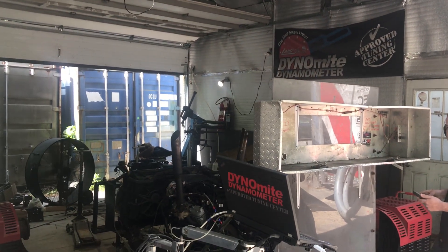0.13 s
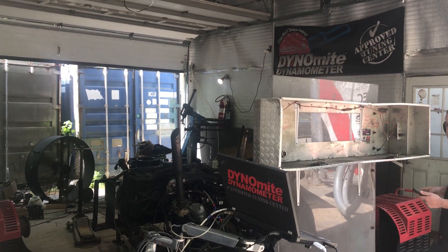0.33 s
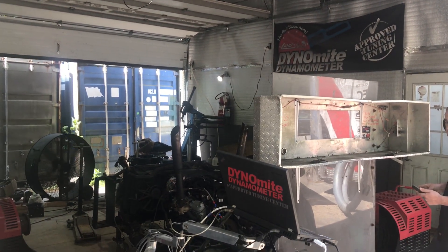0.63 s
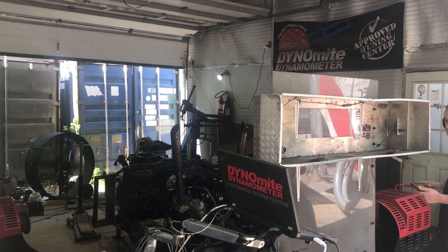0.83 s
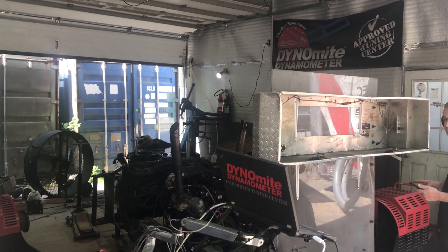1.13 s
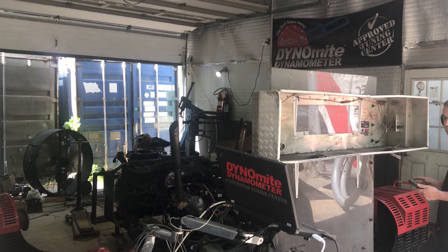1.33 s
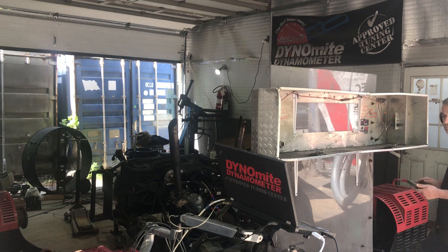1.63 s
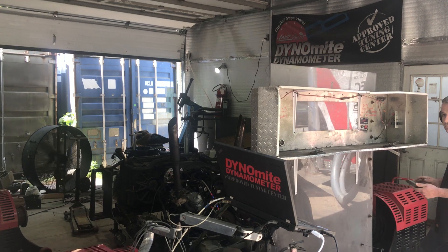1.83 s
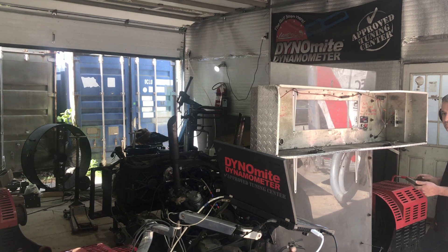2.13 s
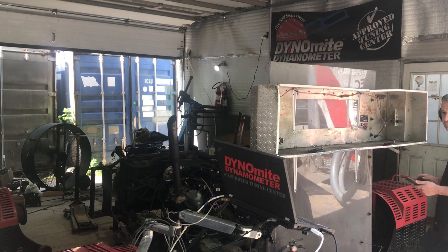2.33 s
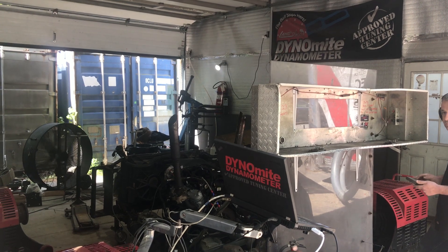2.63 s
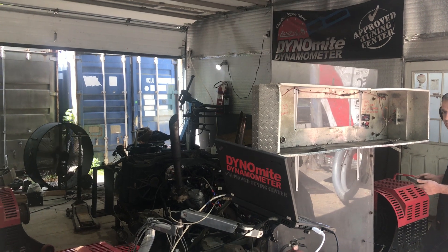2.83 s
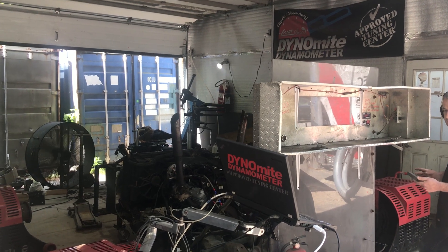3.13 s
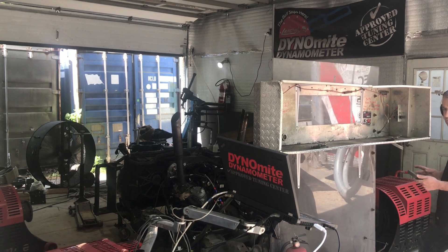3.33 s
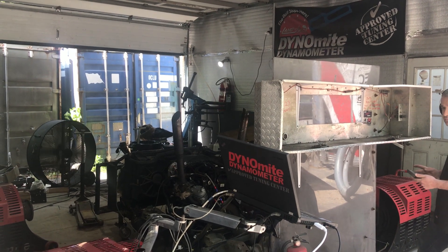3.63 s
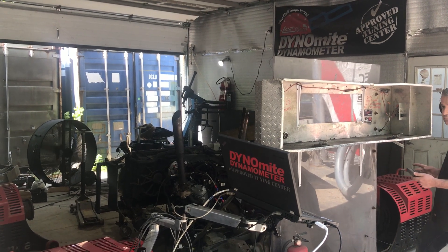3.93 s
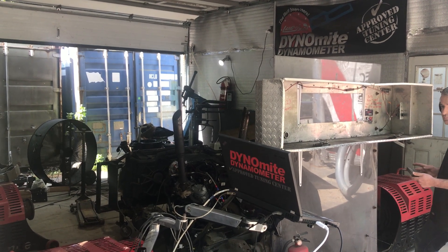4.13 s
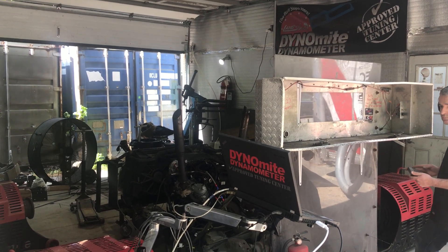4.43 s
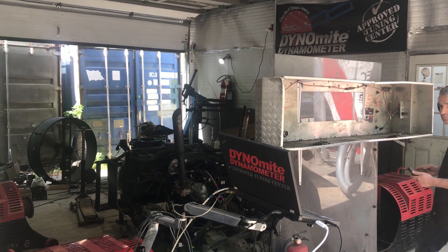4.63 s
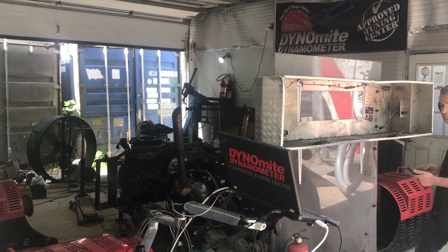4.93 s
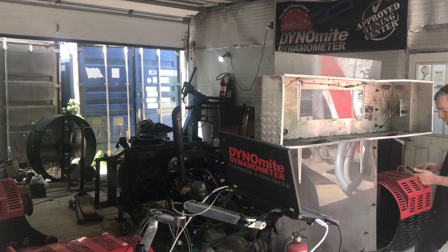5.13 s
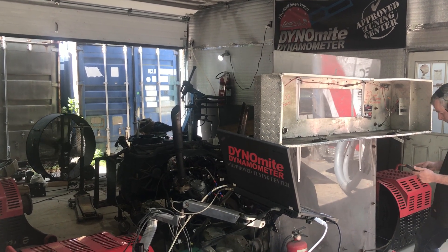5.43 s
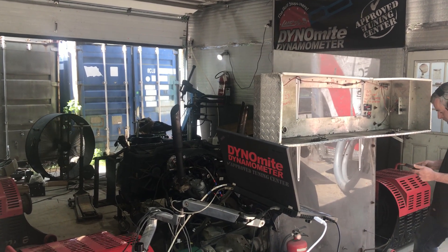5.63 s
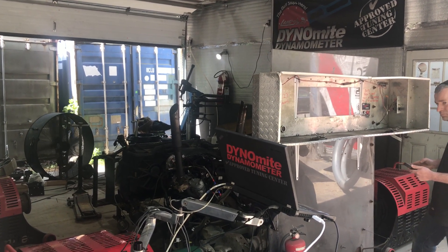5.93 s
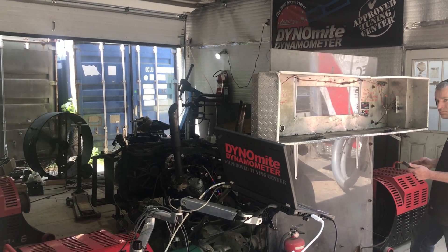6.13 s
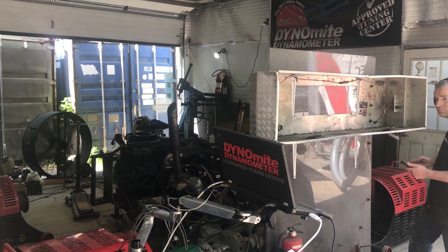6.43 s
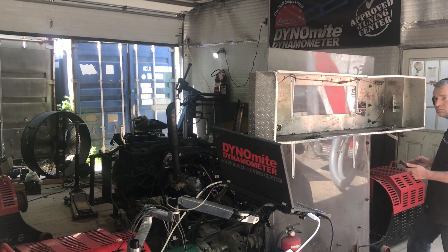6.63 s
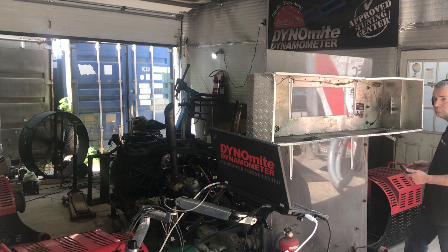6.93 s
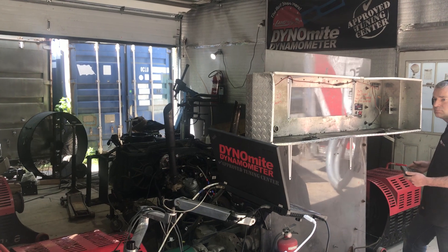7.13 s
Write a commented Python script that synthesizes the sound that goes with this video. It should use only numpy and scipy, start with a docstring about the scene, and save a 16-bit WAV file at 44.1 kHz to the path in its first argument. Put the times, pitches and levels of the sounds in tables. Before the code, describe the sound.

A V8 engine with open exhaust stacks runs close by in a workshop. It settles into a lumpy idle with a faint, thin whistle, is blipped once and falls back with a hollow bark. Then the throttle opens wide: the revs surge, are dragged down under load, hold in a deep rasping roar and finally climb again. The walls add boom and a short echo.

```python
"""Cross-plane V8 with open exhaust stacks on a workshop dynamometer: lumpy idle, a blip, then full
throttle against the brake. Each firing rings the stacks and the room and releases a burst of gas.
The near bank fires unevenly and is the louder one. Load drives bass and bark, throttle drives rasp.
The firing tone swells and fades as it glides through the room's standing waves.
At idle, air whistles faintly past the throttle."""
import sys
import numpy as np
from scipy import signal
from scipy.fft import rfft, irfft, next_fast_len
from scipy.io import wavfile
from scipy.ndimage import uniform_filter1d

SR = 44100
rng = np.random.default_rng(int(sys.argv[2]) if len(sys.argv) > 2 else 0)


def generate_wav(sig):
    """Save sig (samples, or channels by samples) to the path in sys.argv[1] as 16-bit PCM at SR."""
    pcm = np.round(np.clip(np.atleast_2d(sig).T, -1, 1) * 32767).astype(np.int16)
    wavfile.write(sys.argv[1], SR, pcm)


N = 321489
TIME_S = np.arange(N) / SR

# target speed: t/s, firing rate/Hz
SPEED = [(0.0, 57.76), (0.097, 66.8), (0.499, 83.67), (1.103, 91.76), (1.63, 130.32), (1.959, 146.45),
         (2.146, 142.82), (2.711, 97.48), (3.037, 99.53), (3.483, 145.56), (3.642, 151.21), (3.884, 137.71),
         (4.165, 113.11), (4.443, 106.57), (5.085, 116.62), (5.883, 109.35), (6.155, 115.85),
         (6.821, 152.81), (7.29, 170.6)]
# idle, blip, overrun, wide open: t/s, throttle/0-1, load/0-1, base crackle level/dB
DRIVE = [(0, 0.82, 1, -25.5), (.48, 0.51, 0.66, -30.5), (.78, 0.16, 0.43, -45.5), (.98, 0.19, 0.47, -42),
         (1.26, 0.51, 1, -28.5), (1.36, 0.4, 0.74, -31), (1.48, 0.15, 0.02, -37), (2.0, 0, 0.12, -41),
         (2.45, 0.02, 0, -39.5), (2.85, 0.31, 0.06, -36), (3.03, 0.67, .4, -30), (3.17, 0.79, 0.87, -26),
         (3.42, 1, 0.75, -24.5), (7.29, 0.98, 0.84, -25)]
# cylinders in firing order: bank (1 near, -1 far)
BANK = [1, -1, -1, 1, -1, 1, 1, -1]
# cylinders in firing order: relative gas burst level/dB
BURST_DB = [0, -49, -9, 3, -16, 0.5, 2, -27]
# unequal headers, orders 9-30 of the four-stroke cycle: relative level/dB
HEADER_ORDERS_DB = [1, -3, 7.5, -3, 10, 4, 3, 4, 7, -5, 3.5, 0.5, 12.5, -10.5, 8, 3.5, -5, 5, 2, -6, 6.5,
                    2.5]
# low response of the stacks: f/Hz, gain/dB
PIPE_RESPONSE = [(135, -9), (168, 4), (203, -13.5), (235, -6), (272, 3.5), (300, -1), (325, -11),
                 (356, -3.5), (380, -8.5), (404, -5), (455, -32.5), (600, -49)]
# upper stack resonances: f/Hz, width/Hz, gain/dB
STACK_MODES = [(556.6, 63, -6), (639.6, 64, 3), (715.6, 52, -2), (801, 40, -6), (870.5, 32, -1),
               (959.5, 52, -3.5), (1055, 68, -7.5), (1249, 164, -11.5), (1430, 410, -15.5)]
# stack mouth resonances under hard flow: f/Hz, width/Hz, gain/dB
MOUTH_MODES = [(418, 22, 9.5), (693, 79, -5), (964, 193, -2), (1040, 38, 0), (2890, 85, -10),
               (3530, 2100, -11)]
# broadband gas noise: f/Hz, gain/dB
RASP_SPECTRUM = [(35, -4.5), (400, -2), (700, -5), (1000, 1), (1500, -2.5), (2300, -2.5), (3200, -2),
                 (4100, -3.5), (5000, -6), (6500, -6.5), (10000, -21)]
# treble gas noise: f/Hz, gain/dB
CRACKLE_SPECTRUM = [(2500, -49), (5000, -8.5), (6000, -3), (7000, 4), (7700, 1), (8600, 3), (9800, -0.5),
                    (10400, -4), (11200, -1), (13000, -2.5), (15800, -11.5)]
# standing waves of the workshop: f/Hz, width/Hz, gain/dB
ROOM_MODES = [(75.4, 14, -6), (113.7, 28.3, 1), (129.9, 15, -4)]
# bass in the room at full load: firing rate/Hz, tone level/dB, boom level/dB, pipe level/dB
BASS_LEVELS = [(60, -16, -20, -20), (70, -16, -13.5, -26), (75.5, -11.5, -15.3, -23),
               (89.5, -15.5, -15, -22), (100, -18.3, -23, -24.5), (106.6, -15, -22.5, -18),
               (111, -10, -31, -23), (120, -11, -22.5, -22.5), (136.5, -10.5, -23.5, -23),
               (148, -24.5, -20, -21), (159, -34, -15.5, -18.5), (167, -23.3, -15.5, -20)]
# intake whistle: t/s, f/Hz, level/dB
WHISTLE = [(.42, 2070, -75), (.5, 2060, -51), (.55, 2050, -46), (.61, 2070, -47), (.68, 2140, -51),
           (.78, 2020, -56), (.9, 2140, -82)]


def engine():
    """Eight cylinders fire in turn into two stacks; flywheel inertia smooths the speed."""
    firing_hz = smooth(curves(SPEED)[0], 5733, mode="nearest")
    crank = np.cumsum(firing_hz) / SR - 1.077  # angle/firings
    return bass(crank, firing_hz) + roar(crank, firing_hz)


def firings(crank):
    """Sample position and cylinder of each firing."""
    count = np.arange(-1, int(crank[-1]) + 1)
    return np.interp(count, crank, np.arange(N)), count % len(BANK)


def bass(crank, firing_hz, idle_scatter_db=3, load_scatter_db=0.3):
    """Firing tone, lumpy room boom and pipe note; combustion is uneven at idle and steadies with speed."""
    tone_db, boom_db, pipe_db = bass_levels(firing_hz)
    at, cylinder = firings(crank)
    idling = np.interp(firing_hz, [88, 112], [1, 0])
    scatter_db = load_scatter_db + (idle_scatter_db - load_scatter_db) * idling[at.astype(int)]
    charge = undb(scatter_db * rng.standard_normal(len(at)))
    unevenness = charge - np.mean(charge)
    boom = ring(pulses(at, 0.26 * np.array(BANK)[cylinder] + unevenness), ROOM_MODES)
    pipe = pipe_note(crank, firing_hz, idling, pulses(at, unevenness))
    return undb(tone_db) * firing_tone(crank, firing_hz) + level(boom, boom_db) + level(pipe, pipe_db)


def bass_levels(firing_hz, sags_db=(5, 6, 1)):
    """Tone, boom, pipe levels/dB: the room lifts or sinks each with speed; all sag off load."""
    _, load, _ = curves(DRIVE)
    hz, *levels_db = np.transpose(sorted(BASS_LEVELS))
    return [np.interp(firing_hz, hz, db) - sag * (1 - load) for db, sag in zip(levels_db, sags_db)]


def firing_tone(crank, firing_hz, weak_at_firings=3.2, lope_depth=0.8, lope_fade_hz=(100, 111)):
    """Fundamental of all cylinders; at low speed a weak one dips it once per cycle."""
    dip = np.cos(np.pi * (crank - weak_at_firings) / len(BANK)) ** 6
    lope = 1 - lope_depth * np.interp(firing_hz, lope_fade_hz, [1, 0]) * (dip - np.mean(dip))
    return np.sqrt(2) * lope * np.sin(2 * np.pi * (crank - 0.12))


def pipe_note(crank, firing_hz, idling, uneven_kicks, strain_hz=(122, 150), strain_db=11):
    """Growl through the stacks, roughened by strong and weak firings at idle and under strain."""
    throttle, _, _ = curves(DRIVE)
    strain = throttle * np.interp(firing_hz, strain_hz, [0, 1])
    rough_db = -10 + 10 * idling + strain_db * strain
    clean = level(colour(growl(crank / len(BANK)), PIPE_RESPONSE), 0)
    rough = level(colour(uneven_kicks, PIPE_RESPONSE), rough_db)
    return room(clean + rough, wet_db=-7)


def growl(cycle):
    """Unequal headers: pressure that repeats every four-stroke cycle. Orders above 30 are flat."""
    orders = np.arange(9, 48)
    gains = undb(np.r_[HEADER_ORDERS_DB, np.zeros(len(orders) - len(HEADER_ORDERS_DB))])
    return sum(g * np.sin(2 * np.pi * (k * cycle + rng.random())) for k, g in zip(orders, gains))


def roar(crank, firing_hz, scatter_db=3.5, jitter_s=0.00008, far_bank_gain=0.38):
    """Pressure blows and gas bursts: hollow bark with the throttle shut, rasping rush with it open."""
    bark_db, rasp_db, crackle_db = roar_levels(firing_hz)
    at, cylinder = firings(crank)
    jitter, *scatters = rng.standard_normal((len(at), 3)).T
    flow = np.interp(rasp_db, [-36, -24], [0, 1])  # 0 gentle, 1 hard
    bank_gain = np.where(np.array(BANK)[cylinder] > 0, 1, far_bank_gain)
    blows = pulses(at + jitter_s * SR * jitter, bank_gain)
    puffs, spits = (pulses(at, undb(np.array(BURST_DB)[cylinder] + scatter_db * s)) for s in scatters)
    return (level(bark(blows, puffs), bark_db - 5.1 * flow)
            + level(rasp(puffs, flow), rasp_db + 3.5)
            + level(crackle(spits, flow), crackle_db)
            + undb(rasp_db + 36.5) * stack_sing(at))


def roar_levels(firing_hz, cruise_hz=110):
    """Base bark, rasp, crackle levels/dB: bark follows load, rasp throttle; all rise with speed."""
    throttle, load, crackle_db = curves(DRIVE)
    octaves = np.log2(firing_hz / cruise_hz)
    bark_db = -24.5 - 9 * (1 - load) + 6.5 * octaves
    rasp_db = -24 - 19.5 * (1 - throttle) + 6.5 * octaves
    return bark_db, rasp_db, crackle_db + 4 * octaves


def bark(blows, puffs):
    """Blows and gas ring the upper stack resonances."""
    struck = ring(blows, STACK_MODES)
    blown = ring(gas(puffs, width_s=0.0045, steady=1), STACK_MODES)
    return room(level(struck, 0) + level(blown, 1), wet_db=-5)


def rasp(puffs, flow):
    """Broadband gas rush; hard flow rings the stack mouths."""
    rush = colour(gas(puffs, width_s=0.0025, steady=2.57), RASP_SPECTRUM)
    return room(rush + flow * ring(rush, MOUTH_MODES), wet_db=-7.5)


def crackle(spits, flow):
    """Separate treble ticks that fill in as more gas flows."""
    ticks = gas(spits, width_s=0.0022, steady=0.65 + 0.16 * flow)
    return room(colour(ticks, CRACKLE_SPECTRUM), wet_db=-4)


def gas(kicks, width_s, steady):
    """Turbulence swelling and dying with each valve opening, over a steady flow."""
    t = np.arange(-512, 513) / SR
    flare = signal.fftconvolve(kicks, np.exp(-(t / width_s) ** 2), "same")
    return (level(flare, 0) + steady) * rng.standard_normal(N)


def stack_sing(at, hz=808, width_hz=23):
    """A sharp stack resonance sings when a firing harmonic rests on it."""
    return ring(pulses(at, np.ones(len(at))), [(hz, width_hz, 0)])


def intake_whistle():
    """Air past the nearly shut throttle: a thin, wavering tone at idle."""
    hz, db = curves(WHISTLE)
    waver = level(uniform_filter1d(rng.standard_normal(N), size=300), -52)
    phase = 2 * np.pi * np.cumsum(hz * (1 + waver)) / SR
    return np.sqrt(2) * undb(db) * np.sin(phase) * (TIME_S < WHISTLE[-1][0])


def room(x, wet_db, t60_s=0.3, predelay_s=0.003):
    """Direct sound plus a dense, fading tail from the walls."""
    t = TIME_S[:SR // 2]
    tail = rng.standard_normal(len(t)) * undb(-60 * t / t60_s) * (t > predelay_s)
    return x + undb(wet_db) * signal.fftconvolve(x, tail / np.linalg.norm(tail))[:N]


def pulses(at, size):
    """One pulse per firing, split between adjacent samples."""
    inside = (at >= 0) & (at < N - 1)
    at, size = at[inside], size[inside]
    i = at.astype(int)
    return np.bincount(i, size * (1 - at + i), N) + np.bincount(i + 1, size * (at - i), N)


def ring(x, modes):
    """Parallel resonances, each applied twice for steep flanks."""
    out = 0
    for hz, width_hz, db in modes:
        b, a = signal.iirpeak(hz, hz / width_hz, fs=SR)
        out = out + undb(db) * signal.lfilter(b, a, signal.lfilter(b, a, x))
    return out


def colour(x, spectrum):
    """Filter by (f/Hz, gain/dB) points; 12 dB/octave roll-off below the first."""
    hz, db = np.transpose(spectrum)
    size = next_fast_len(N + 4096, True)
    bin_hz = np.maximum(np.fft.rfftfreq(size, 1 / SR), 1)
    gain = undb(np.interp(np.log(bin_hz), np.log(hz), db)) * np.minimum(bin_hz / hz[0], 1) ** 2
    return irfft(rfft(x, size) * gain, size)[:N]


def level(x, db):
    """Set the slow RMS to db; single firings keep their differences."""
    power = smooth(x ** 2, 6000)
    return x * undb(db) / np.sqrt(np.abs(power) + 1e-18)


def smooth(x, samples, mode="reflect"):
    """Moving average, applied twice."""
    return uniform_filter1d(uniform_filter1d(x, samples, mode=mode), samples, mode=mode)


def curves(table):
    """Table columns, linearly interpolated over time."""
    t_s, *columns = np.transpose(table)
    return [np.interp(TIME_S, t_s, column) for column in columns]


def undb(db):
    return 10 ** (np.asarray(db) / 20)


def scene():
    """Engine and intake whistle, mono."""
    return (engine() + intake_whistle())[None]


def record(dry, ceiling=0.79, knee=6, top_hz=15850):
    """Soft peak limit, then a steep low-pass."""
    rounded = dry / (1 + np.abs(dry / ceiling) ** knee) ** (1 / knee)
    return signal.sosfilt(signal.ellip(10, 0.2, 80, top_hz, fs=SR, output="sos"), rounded)


dry = scene()
out = record(dry)
generate_wav(out)
```